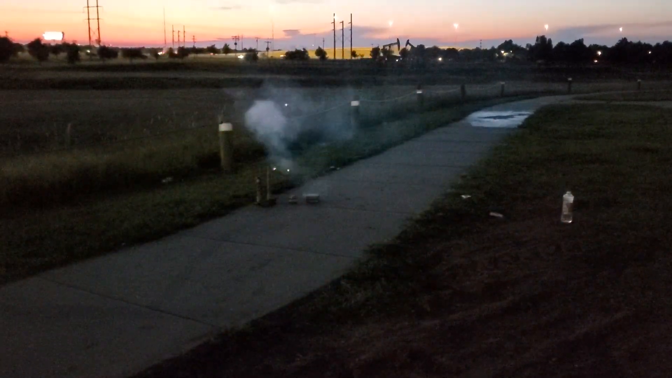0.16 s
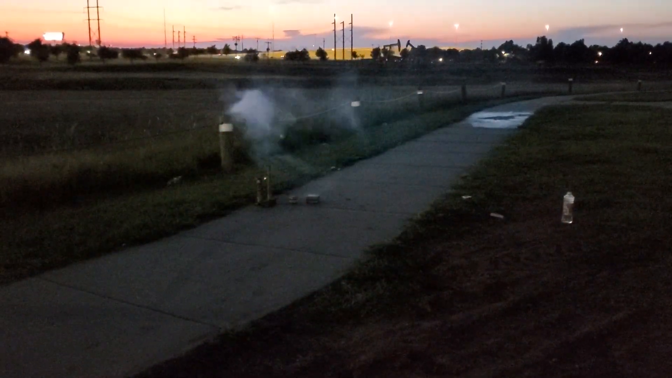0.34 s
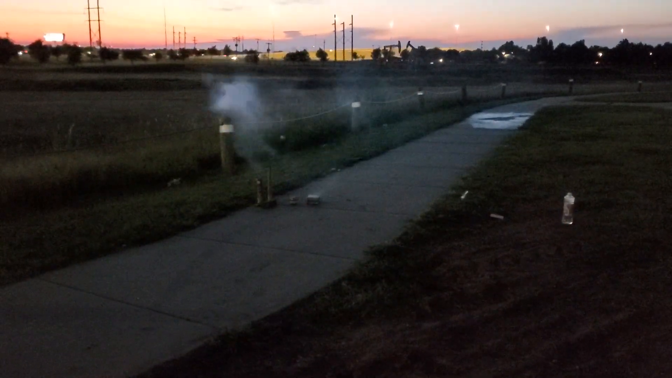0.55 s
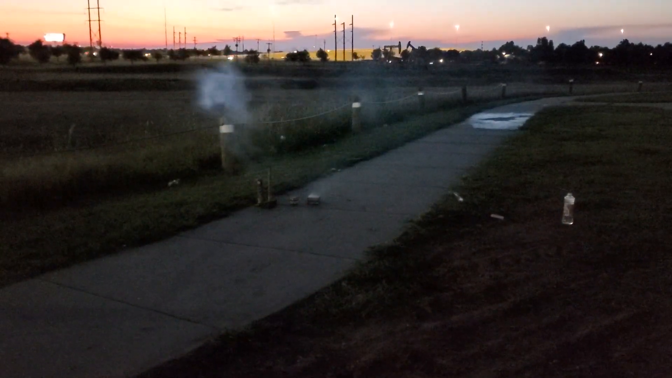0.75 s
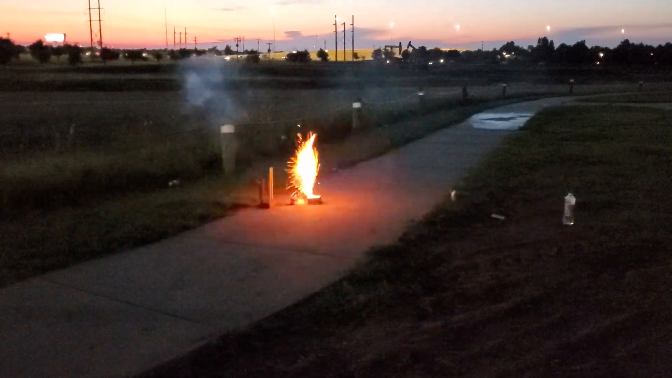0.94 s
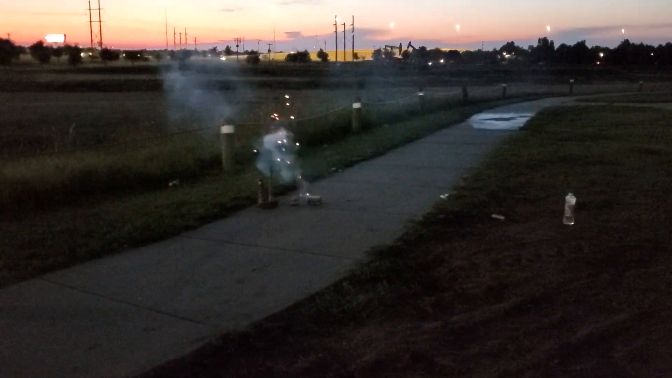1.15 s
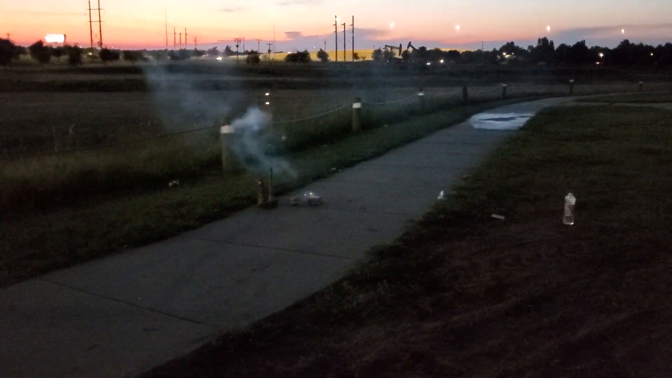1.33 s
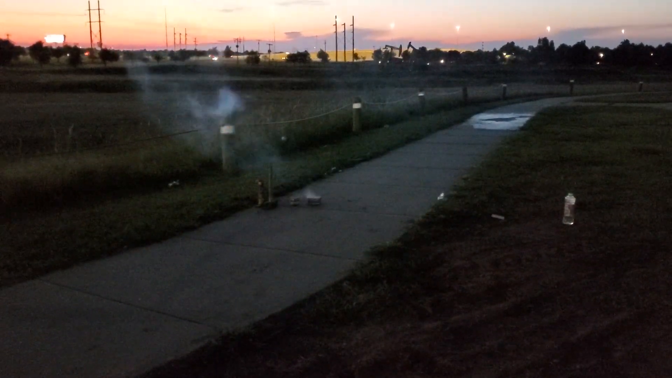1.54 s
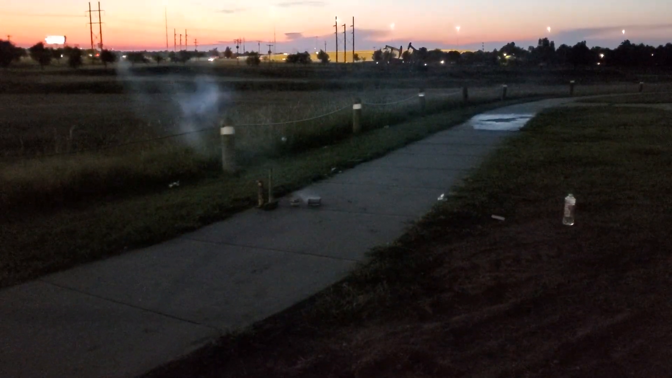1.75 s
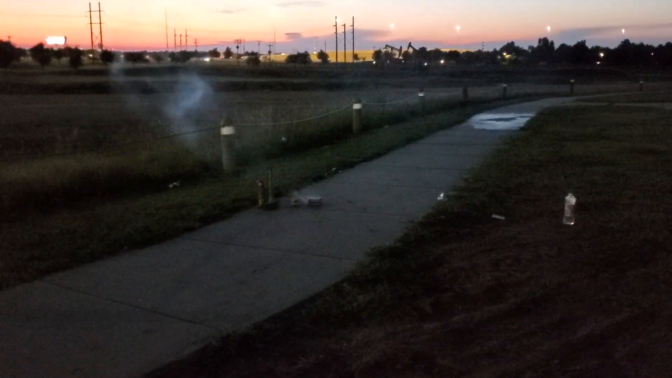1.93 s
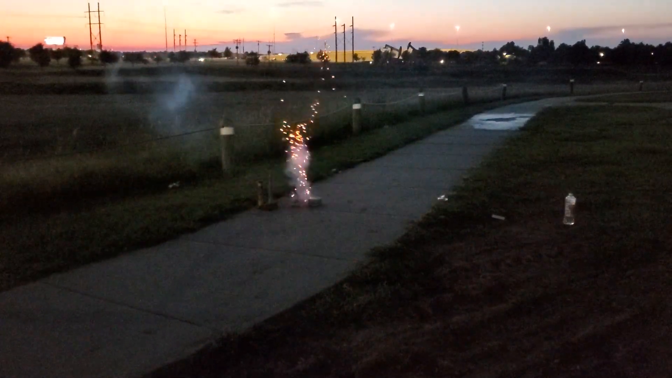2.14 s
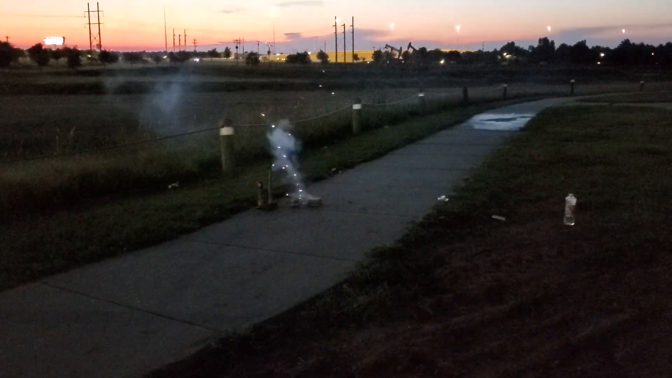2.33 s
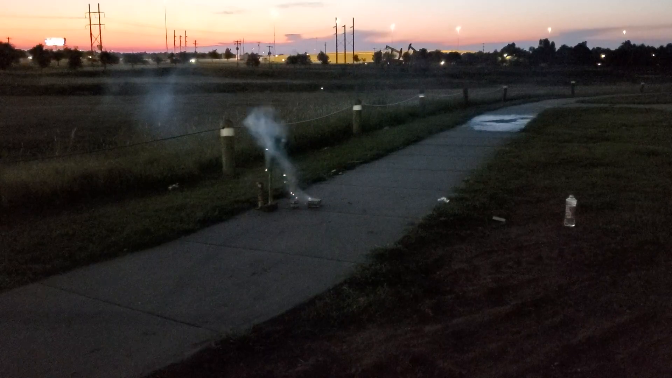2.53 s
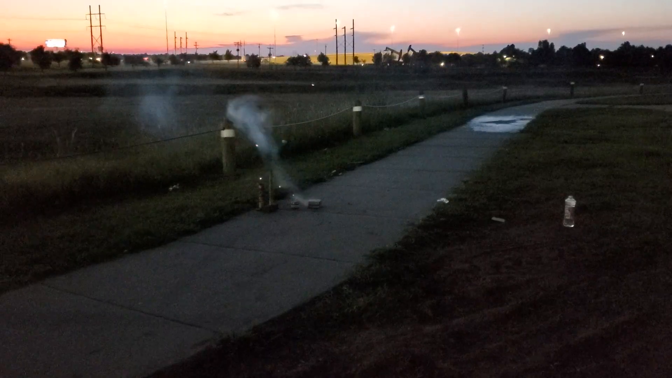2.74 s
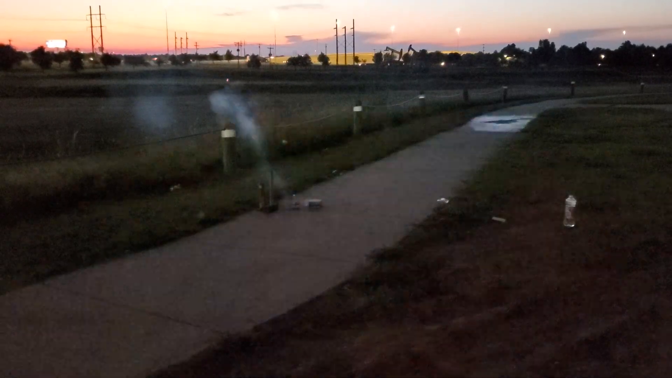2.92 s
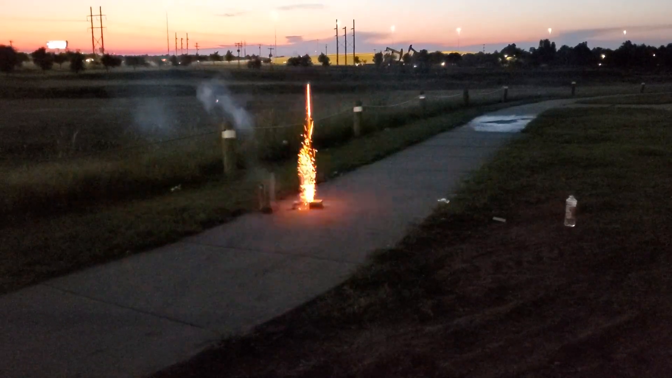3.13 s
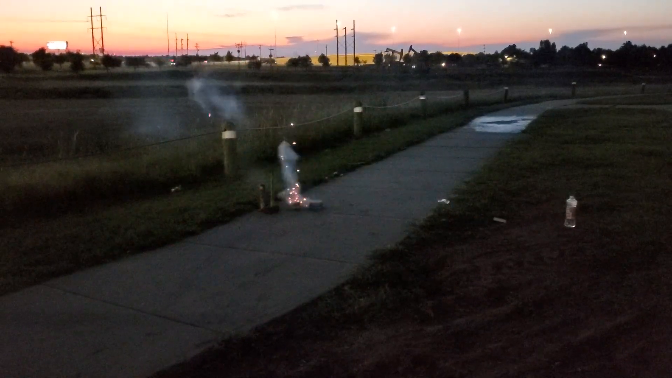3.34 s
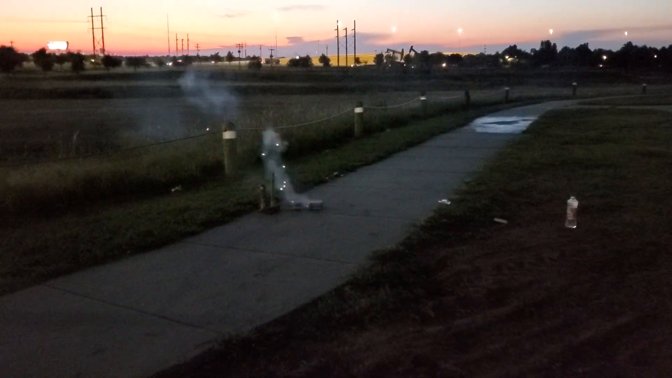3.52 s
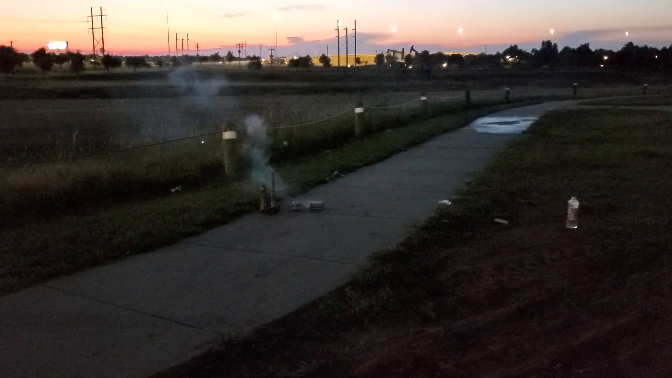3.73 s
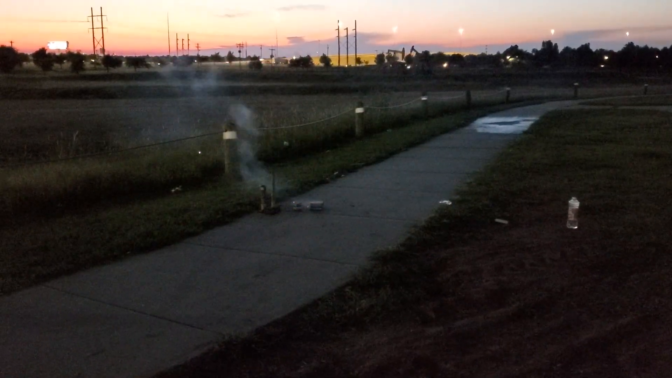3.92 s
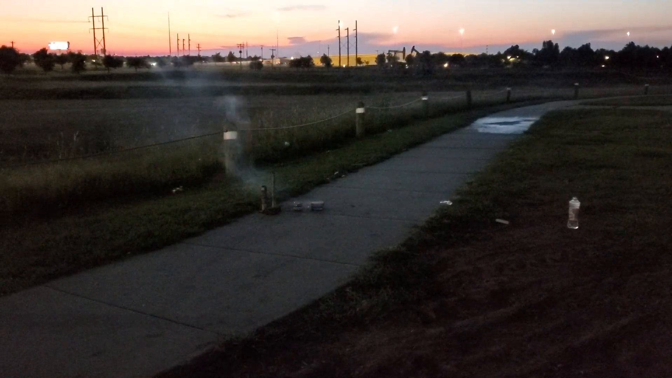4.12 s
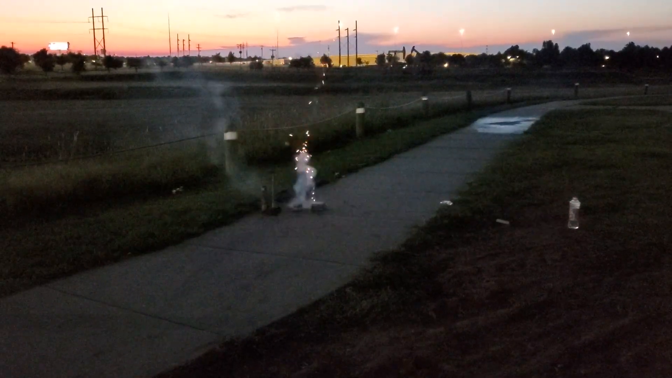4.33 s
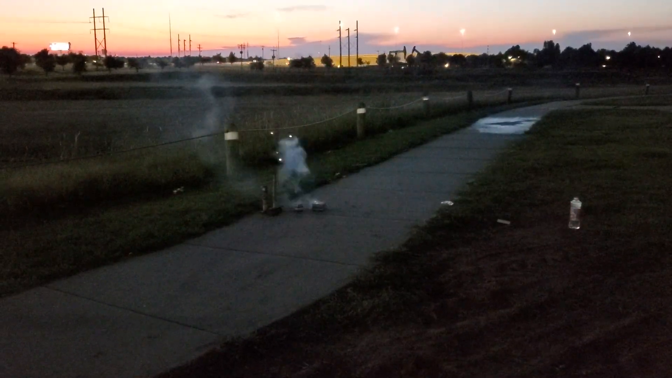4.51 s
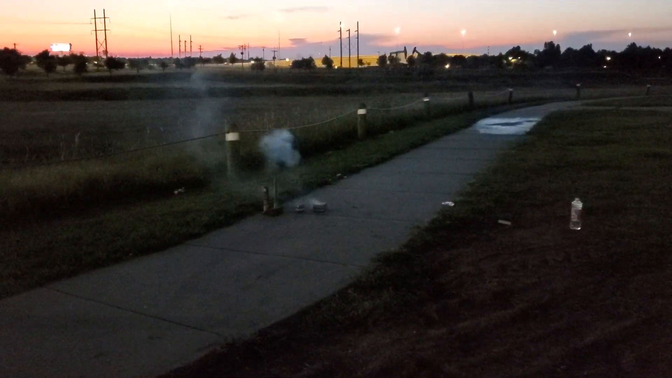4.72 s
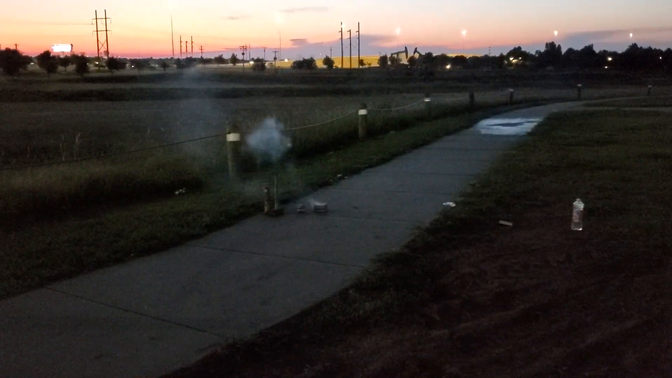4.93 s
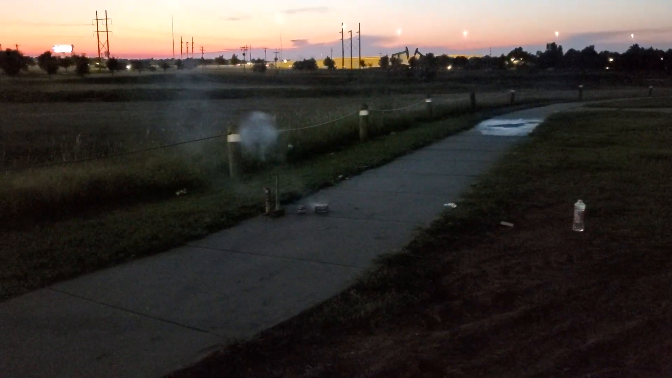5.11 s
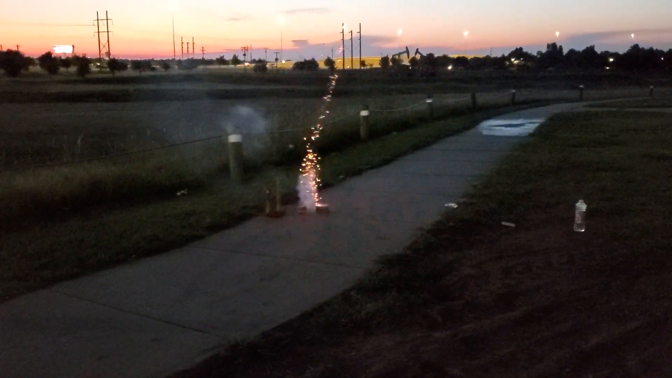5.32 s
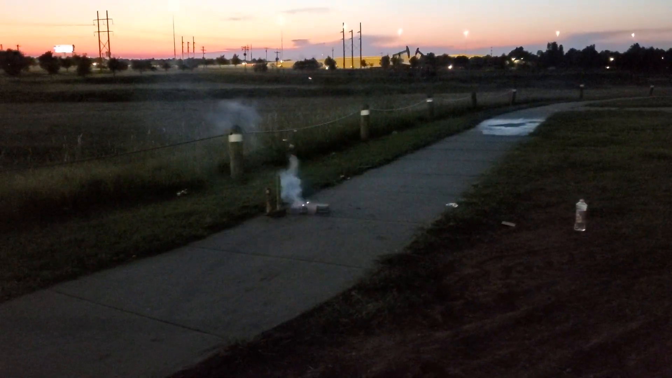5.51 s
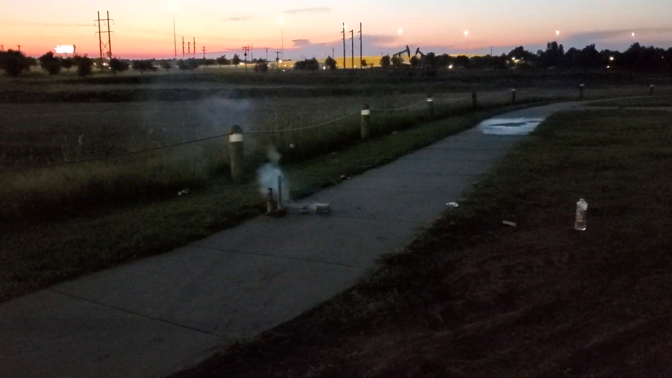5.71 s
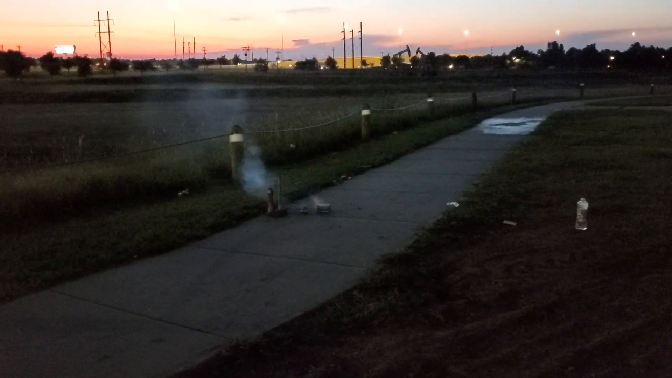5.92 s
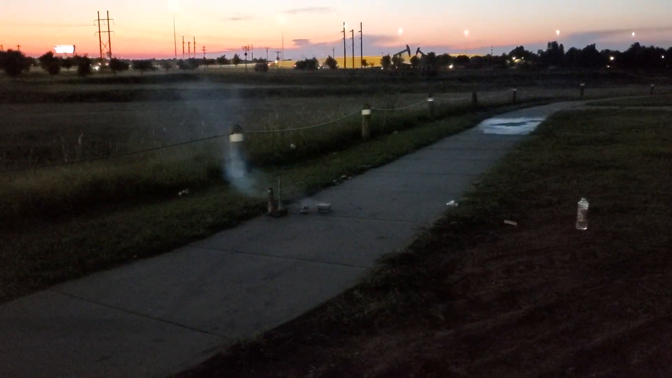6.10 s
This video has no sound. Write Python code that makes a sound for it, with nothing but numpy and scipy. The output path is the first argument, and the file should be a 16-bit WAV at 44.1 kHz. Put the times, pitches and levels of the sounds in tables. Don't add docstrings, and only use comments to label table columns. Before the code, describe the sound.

Five small rockets leave a tube about a second apart with short falling whistles, amid hard overhead cracks and distant booms across open fields.

```python
import sys
import numpy as np
from scipy import signal
from scipy.fft import rfft, irfft
from scipy.io import wavfile
from scipy.ndimage import uniform_filter1d

SR = 44100
rng = np.random.default_rng(int(sys.argv[2]) if len(sys.argv) > 2 else 0)


def voltage_ratio(decibels):
    exponent = np.asarray(decibels, float) / 20
    return 10 ** exponent


def store_pcm(level_fs):
    pcm = np.round(np.clip(level_fs, -1, 1) * 32767).astype(np.int16)
    wavfile.write(sys.argv[1], SR, np.atleast_2d(pcm).T)


N = 271656
T = np.arange(N) / SR

# [t/s, f/Hz, level/dB]
CLIMBS = [
    [(1.02, 2997, -13), (1.032, 2894, -17), (1.074, 2980, -15), (1.154, 2907, -14), (1.19, 2815, -19)],
    [(2.1, 2937, -24), (2.12, 2859, -17), (2.196, 2771, -14), (2.215, 2801, -19)],
    [(3.18, 2982, -12), (3.184, 2988, -16), (3.338, 2784, -17), (3.345, 2784, -22)],
    [(4.26, 2941, -17), (4.3, 3008, -15), (4.396, 2842, -15), (4.488, 2610, -23), (4.53, 2601, -24)],
    [(5.32, 2974, -16), (5.376, 2952, -14), (5.47, 2738, -16), (5.566, 2639, -22), (5.575, 2758, -24)],
]
# [t before steady note/s, pitch rise/share, extra level/dB]
IGNITIONS = [
    (.02, 0.17, 2),
    (0.009, 0.36, 5.5),
    (.014, 0.0452, 10),
    (.021, .15, 11),
    (.02, 0.18, 10),
]
# [t/s, length/s, pitch f/Hz, pitch sag/Hz, level/dB]
RETURNS = [
    (1.189, 0.03, 3102, 124, -17.5),
    (1.218, 0.015, 2716, -100, -19),
    (1.24, .133, 2986, 277, -21),
    (2.216, 0.12, 2952, 152, -24),
    (2.505, .135, 2830, 84.5, -46.5),
    (3.344, .225, 3012, 398, -23.5),
    (4.53, 0.22, 2818, 133, -28),
    (5.573, 0.15, 2888, 202, -25.5),
]
# [t/s, f/Hz, level/dB]
LEFTOVER = [
    (0.0, 3001, -24),
    (.05, 2930, -25),
    (.112, 2834, -24),
    (.172, 2849, -34),
    (.2, 2790, -43),
]
# [multiple of f/1, level/dB]
OVERTONES = [(1.5, -29), (2, -8.5), (2.5, -24), (3, -3), (3.5, -14), (4, 3), (5, 7)]
# [f/Hz, level/dB]
GAS = [(1800, -34), (3300, -44), (5200, -38.5), (6700, -2), (8000, -4.5), (9500, -11.5), (12000, -2),
       (16500, 1)]
IMAGE_BEAT_HZ, IMAGE_SHARE, RETURN_SHARE = 71, .68, .4
RETURN_FADE_DB, RETURN_FULL_S, RETURN_FLOOR_DB = 24.5, 0.12, -48.5
SAG_POWER, FADE_POWER = 1.2, 1.36
TREBLE_DB, TREBLE_LOSS_DB_S = -11.5, 42.5
RETURN_TREBLE_DB, RETURN_LOSS_DB_S, DULLEST_DB = -15, 119, -28
LEFTOVER_TREBLE_DB, RETURN_GAS_DB = 5, -3

# [t/s, peak level/dB, ground echo delay/ms, ground echo level/dB, spark fizz level/dB]
BURSTS = [
    (0.0299, -5.5, 8.7, -6, -41.5),
    (0.931, -3.5, 7.5, 1.5, -38.5),
    (2.0847, -3.5, 8.7, -4, -38.5),
    (3.0611, -3, 7.5, 6, -40),
    (4.4338, -3.5, 7.8, 1, -40),
    (5.4825, 0.5, 8.7, -4, -42.5),
]
SHOCK_MS, BURST_PAN_DB = .28, .7

# [t/s, peak level/dB]
POPS = [
    (.988, -20.5),
    (2.072, -21),
    (3.152, -19),
    (4.23, -17),
    (5.289, -18.5),
]
POP_HZ, POP_T60_MS, POP_PAN_DB, THUMP_HZ, THUMP_DB = 1117, 23.5, 3.5, 326, -4.5
# [t/s, peak level/dB, ring f/Hz]
SPITS = [
    (.921, -28, 2360),
    (2.052, -34.5, 1230),
    (2.064, -24, 2420),
    (3.051, -22, 2720),
    (5.262, -38.5, 903),
    (5.799, -32.5, 442),
    (5.826, -32, 437),
]
# [t/s, peak level/dB, ring f/Hz, left
# minus right level/dB]
SNAPS = [(.12, -36, 2040, -2), (0.213, -36, 2970, 1), (.3, -33.5, 2310, -2.5), (.317, -39, 1920, 5.5),
         (.956, -26, 2150, -6), (0.968, -17.5, 2430, 6), (1.03, -21.5, 2210, -0.5),
         (1.2908, -20, 810, -0.5), (1.362, -28.5, 398, -11), (1.5066, -16, 1150, 0),
         (1.6199, -33.5, 1177, -2), (1.641, -36, 1180, 39), (2.113, -16.5, 1630, -1),
         (2.298, -28.5, 1150, -12), (3.092, -18.5, 1860, 16.5), (3.108, -18, 2220, 0.5),
         (3.315, -27, 2190, -1), (3.344, -29, 2280, 6), (4.465, -25, 2320, 6), (4.607, -34, 533, 3),
         (4.671, -37, 406, -18), (4.715, -29, 2290, -2), (5.519, -32, 2320, 2), (5.585, -26.5, 1850, 6),
         (5.656, -49, 2000, -19.5), (5.72, -37, 2280, -5.5)]
SPIT_T60_MS, SNAP_T60_MS = 45, 11

# [t/s, shock level/dB, boom level/dB, boom f/Hz, left lag/ms]
SHELLS = [
    (1.2912, 4, -5.5, 200, .5),
    (1.5058, -7, 0, 280, .53),
    (1.619, -34.5, -14, 190, .13),
    (2.1758, -19.5, -6, 230, .28),
]
# [t/s, boom level/dB, boom f/Hz, left minus right level/dB]
THUDS = [
    (0.916, -16.5, 143, 19),
    (1.167, -20.5, 152, -6),
    (1.772, -19.5, 111, -4),
    (2.287, -14, 199.4, 3),
    (2.615, -25, 116, -16),
    (4.444, -14, 139, -4),
    (4.791, -26, 106, -17.5),
]
SHELL_PAN_DB, THUD_LAG_MS, SHELL_FIZZ_DB = -4, .08, -66.5

# [f/Hz, width ratio/1, t60/s, level/dB]
FIELD = [(242, 1.8, 1.0, -37), (698, 3.7, 1.1, -33), (1600, 1.4, 0.86, -23), (3036, 1.078, 1.72, -25),
         (3040, 2.4, 0.71, -51.5), (6040, 2, 0.53, -17), (11000, 1.4, .35, -45)]

# [f/Hz, level per Hz/dB]
TRAFFIC = [(59, -14), (100, -13.5), (156, -8), (365, -39), (433, -33), (481, -14.5), (836, -11.5),
           (910, -13), (2470, -17.5), (2860, -12), (4870, -39), (16000, -67)]
TRAFFIC_DB = -52.5
# [t of crest/s, lift level/dB]
MURMURS = [
    (.03, 7),
    (.5, 4),
    (.96, 11),
    (1.51, 9),
    (1.85, 6),
    (2.198, 14),
    (3.09, 10.5),
    (4.5, 11.5),
    (5.5, 10),
]
MURMUR_DB, MURMUR_RISE_DB_S, MURMUR_FALL_DB_S = -2, 84, 17.5
# [t of crest/s, level/dB]
ROLLS = [
    (0.0, -49.5),
    (.96, -51),
    (1.36, -39),
    (1.55, -44.5),
    (2.3, -40),
    (3.09, -50),
    (4.42, -41.5),
    (4.65, -45.5),
    (5.4, -57),
]
ROLL_RISE_DB_S, ROLL_FALL_DB_S, ROLL_BED_DB = 136, 37.5, -55.5
FIZZ_RISE_DB_S, FIZZ_FALL_DB_S = 3000, 108
FIZZ_LATE_DB, FIZZ_LATE_FALL_DB_S = -16, 23.5
# [t of crest/s, level/dB]
GUSTS = [(.17, -31.5), (.55, -34), (.87, -35), (1.1, -38), (1.3, -33), (1.49, -32), (1.65, -36),
         (1.77, -37), (2.19, -33), (2.42, -28), (2.6, -42), (2.91, -44), (3.2, -45), (3.98, -40),
         (4.44, -43.5), (5.08, -37.5), (5.63, -34.5), (5.9, -34.5)]
GUST_RISE_DB_S, GUST_FALL_DB_S, CALM_DB = 70, 103.5, -45.5

# [f/Hz, level/dB]
RIGHT_PORT = [(200, 1), (3000, 1.5), (5000, 2), (9000, -3), (14000, -12.5)]
MIC_HISS_DB, TOP_HZ = -69.5, 16500


def level(x, db):
    return x * voltage_ratio(db) / np.sqrt(np.mean(x ** 2))


def band(x, lo_hz, hi_hz, order=2):
    sos = signal.butter(order, [lo_hz, min(hi_hz, .45 * SR)], "band", fs=SR, output="sos")
    return signal.sosfilt(sos, x)


def colour(x, points):
    hz, db = np.transpose(points)
    f = np.arange(x.shape[-1] // 2 + 1) * SR / x.shape[-1] + 1
    gain = voltage_ratio(np.interp(np.log(f), np.log(hz), db, -120))
    return irfft(rfft(x) * gain, x.shape[-1])


def walk(rate, size=N):
    k = max(int(SR / rate), 1)
    held = np.repeat(rng.standard_normal(size // k + 1), k)
    return 1.3 * uniform_filter1d(uniform_filter1d(held, k), k)[:size]


def crests(s, db, rise_db_s, fall_db_s, bed_db=-120):
    t = T[::32]
    late = t - np.c_[s]
    slope = np.where(late < 0, rise_db_s * late, -fall_db_s * late)
    power = np.sum(voltage_ratio(2 * (np.c_[db] + slope)), axis=0) + voltage_ratio(2 * bed_db)
    return np.interp(T, t, np.sqrt(power))


def add(out, s, x, pan_db=0, lag_ms=0.08):
    for ch, side in enumerate((1, -1)):
        i = max(round((s - side * lag_ms / 2000) * SR), 0)
        row = np.atleast_2d(x)[-ch, :N - i]
        out[ch, i:i + len(row)] += voltage_ratio(side * pan_db / 2) * row


def shock(length_ms, soft):
    t = np.arange(2048) / SR * 1000 / length_ms - .5
    return (1 - 2 * t) * (np.tanh(t / soft) - np.tanh((t - 1) / soft)) / 2


def rockets():
    out = np.zeros((2, N))
    for rows, ignition in zip(CLIMBS, IGNITIONS):
        s, hz, db = np.transpose(rows)
        treble_db = db + TREBLE_DB - TREBLE_LOSS_DB_S * (s - s[0])
        whistle(out, np.c_[s, hz, db, treble_db], IMAGE_SHARE, *ignition)
    leftover = returned(*np.transpose(LEFTOVER)) + [0, 0, 0, LEFTOVER_TREBLE_DB]
    whistle(out, leftover, RETURN_SHARE / 2, gas_db=2 * RETURN_GAS_DB)
    share = np.linspace(0, 1, num=8)
    for start, length, hz, sag_hz, db in RETURNS:
        fade_db = RETURN_FADE_DB * min(length / RETURN_FULL_S, 1) ** 2 * share ** FADE_POWER
        db = np.maximum(db - fade_db, RETURN_FLOOR_DB)
        rows = returned(start + share * length, hz - sag_hz * share ** SAG_POWER, db)
        whistle(out, rows, RETURN_SHARE, gas_db=RETURN_GAS_DB)
    return out


def whistle(out, rows, image, lead=0.0025, rise=0, extra_db=0, gas_db=0):
    s, *columns = np.transpose(rows)
    t = np.arange(s[0] - lead, s[-1] + 0.0046, 1 / SR)
    hz, db, treble_db = (np.interp(t, s, c) for c in columns)
    early = 1 / (1 + np.exp((t - s[0] + 0.0066) / 0.0032))
    attack = np.clip((t - t[0]) / (.003 + .4 * lead), 0, 1)
    edges = attack * np.clip((t[-1] - t) / .008, 0, 1)
    waver = (.004 + .04 * early) * walk(200, size=len(t))
    hz = hz * (1 + rise * early) * (1 + waver)
    beat_hz = IMAGE_BEAT_HZ * (1 + .18 * walk(40, size=len(t)))
    image = image * voltage_ratio(.5 * np.minimum(db - np.median(db), 0) + 2.5 * walk(40, size=len(t)))
    parts = [(1, db + 3 + extra_db * early)]
    for k, d in OVERTONES:
        parts.append((k, db + d + (treble_db - db) * min((k / 4) ** 3, 1.3)))
    direct_path = (hz + beat_hz / 3, 1, -3, 7e-5)
    image_path = (hz - beat_hz * 2 / 3, image, 1.5, 2e-5)
    for path_hz, share, pan_db, lag in (direct_path, image_path):
        phase = 2 * np.pi * np.cumsum(path_hz) / SR + 6 * rng.random()
        for k, part_db in parts:
            blur = (.18 + 1.2 * (k % 1)) * k * walk(400, size=len(t))
            flutter = voltage_ratio((1.3 * np.sqrt(k) + 5 * (k % 1)) * walk(150, size=len(t)))
            ports = np.sin(k * (phase - 2 * np.pi * path_hz * lag * np.c_[0, 1].T) + blur)
            gain = edges * share * flutter * voltage_ratio(part_db)
            add(out, t[0], gain * ports / np.sqrt(1 + image ** 2), pan_db, 0)
    noise = rng.standard_normal((3, len(t)))
    gas = level(colour(noise[0] + .9 * noise[1:], GAS), 0) * voltage_ratio(1.5 * walk(200, size=len(t)))
    add(out, t[0], edges * gas * voltage_ratio(treble_db + gas_db + 6.5))


def returned(s, hz, db):
    treble_db = np.maximum(RETURN_TREBLE_DB - RETURN_LOSS_DB_S * (s - s[0]), DULLEST_DB)
    return np.c_[s, hz, db, db + treble_db]


def bursts():
    out, t = np.zeros((2, N)), np.arange(6000) / SR
    pan_db, length_ms = BURST_PAN_DB, SHOCK_MS
    for s, db, ground_ms, ground_db, _ in BURSTS:
        ground_s, echo_db = s + ground_ms / 1000, db + ground_db
        add(out, s, voltage_ratio(db + 6.0) * shock(length_ms, 0.043), pan_db)
        add(out, s + .0008, voltage_ratio(db - 7) * shock(1.3 * length_ms, .2), pan_db - 5)
        add(out, ground_s, voltage_ratio(echo_db) * shock(1.1 * length_ms, 0.12), pan_db, .03)
        add(out, ground_s + .0007, voltage_ratio(echo_db - 8) * shock(1.3 * length_ms, .2), pan_db - 3)
        grit = rng.standard_normal((2, len(t))) * voltage_ratio(2.5 * walk(700, size=len(t)))
        spray = band(grit[0], 590, 6400, order=1)
        add(out, s, voltage_ratio(db - 36) * band(grit, 5000, 16000) * voltage_ratio(-60 * t / 0.3))
        add(out, s, voltage_ratio(db - 15.5) * spray * voltage_ratio(-60 * t / 0.17))
        add(out, s, voltage_ratio(db - 20) * spray * voltage_ratio(-60 * t / .008))
    return out


def snaps():
    out, t = np.zeros((2, N)), np.arange(2048) / SR
    rows = [(*row, SNAP_T60_MS) for row in SNAPS]
    rows += [(*row, 0, SPIT_T60_MS) for row in SPITS]
    rows += [(*row, POP_HZ, POP_PAN_DB, POP_T60_MS) for row in POPS]
    for s, db, hz, pan_db, t60_ms in rows:
        fade = voltage_ratio(-60000 * t / t60_ms) * (1 - np.exp(-t / 0.00012))
        ring = fade * np.sin(2 * np.pi * hz * t)
        puff = band(fade * rng.standard_normal(len(t)), .7 * hz, min(3.5 * hz, 6000), order=3)
        click = band(fade ** 2 * rng.standard_normal((2, len(t))), 2200, 6300)
        add(out, s + .0012, voltage_ratio(db + 1) * (ring + 1.6 * puff), np.clip(pan_db, -6, 6))
        add(out, s + 0.00109, voltage_ratio(db - 7) * click)
    return out


def shells():
    out, t = np.zeros((2, N)), np.arange(2048) / SR
    rows = [(*row[:-1], SHELL_PAN_DB, row[-1]) for row in SHELLS]
    rows += [(s, -np.inf, *rest, THUD_LAG_MS) for s, *rest in THUDS]
    rows += [(s, -np.inf, db + THUMP_DB, THUMP_HZ, SHELL_PAN_DB, 0) for s, db in POPS]
    for s, shock_db, boom_db, boom_hz, pan_db, left_lag_ms in rows:
        boom = np.sin(2 * np.pi * boom_hz * t) * voltage_ratio(-60 * t * boom_hz / 3.95)
        add(out, s, voltage_ratio(shock_db) * shock(0.756, 0.1), .1, -left_lag_ms)
        add(out, s + 0.0012, voltage_ratio(boom_db) * boom, pan_db, -left_lag_ms)
    return out


def field(dry):
    t = np.arange(int(1.4 * SR)) / SR
    patchy = voltage_ratio(2.94 * walk(92, size=len(t))) * np.clip((t - .01) / 0.021, 0, 1)
    tail = 0
    for hz, ratio, t60, db in FIELD:
        noise = rng.standard_normal((3, len(t)))
        ratio = max(ratio, 1.03)
        scatter = band(noise[0] + .7 * noise[1:], hz / ratio, hz * ratio)
        tail = tail + voltage_ratio(db - 36 - 60 * t / t60) * scatter
    mono = dry.mean(axis=0, keepdims=True)
    return signal.fftconvolve(mono, patchy * tail, axes=1)[:, :N]


def background():
    s, *_, fizz_db = np.transpose(BURSTS)
    murmur = crests(*np.transpose(MURMURS), MURMUR_RISE_DB_S, MURMUR_FALL_DB_S, MURMUR_DB)
    sparks = crests(s, fizz_db, FIZZ_RISE_DB_S, FIZZ_FALL_DB_S)
    sparks += crests(s, fizz_db + FIZZ_LATE_DB, FIZZ_RISE_DB_S, FIZZ_LATE_FALL_DB_S)
    shell_s = [row[0] for row in SHELLS]
    sparks += crests(shell_s, [SHELL_FIZZ_DB], FIZZ_RISE_DB_S, FIZZ_LATE_FALL_DB_S)
    rolling = crests(*np.transpose(ROLLS), ROLL_RISE_DB_S, ROLL_FALL_DB_S, ROLL_BED_DB)
    buffets = crests(*np.transpose(GUSTS), GUST_RISE_DB_S, GUST_FALL_DB_S, CALM_DB)

    noise = rng.standard_normal((9, N))
    left_first = np.array([noise[[0, 3]], np.roll(noise[[0, 3]], 22, axis=1)])
    hum = colour(left_first[:, 0] + 1.07 * noise[1:3], TRAFFIC)
    traffic = level(hum, TRAFFIC_DB + .1) * voltage_ratio(0.8 * walk(9)) * murmur
    rumble = band(left_first[:, 1] + .4 * noise[4:6], 110, 440)
    roll = level(rumble * voltage_ratio(3 * walk(35)), 2.5) * rolling
    crackle = noise[6] * voltage_ratio(2.5 * walk(400)) + .8 * noise[4:6]
    fizz = level(band(crackle, 4600, 7700, order=3), 2) * sparks
    turbulence = band(0.59 * noise[6] + noise[7:], 40.7, 116, order=3)
    wind = level(turbulence * voltage_ratio(1.2 * walk(11)), 0.17) * buffets
    return traffic + roll + fizz + wind


def scene():
    shots = rockets() + bursts() + snaps() + shells()
    return shots + field(shots) + background()


def low_pass(x):
    return signal.sosfilt(signal.butter(12, 16840, fs=SR, output="sos"), x)


def record(dry):
    hissy = dry + voltage_ratio(MIC_HISS_DB) * rng.standard_normal(dry.shape)
    right = colour(hissy[1], [(1, 0.0089)] + RIGHT_PORT)
    ports = np.tanh(0.84 * np.array([hissy[0], right])) / 0.75
    top_cut = signal.ellip(8, .2, 70, TOP_HZ, fs=SR, output="sos")
    mix = signal.sosfilt(top_cut, ports)
    return low_pass(mix)


dry = scene()
out = record(dry)
store_pcm(out)
```